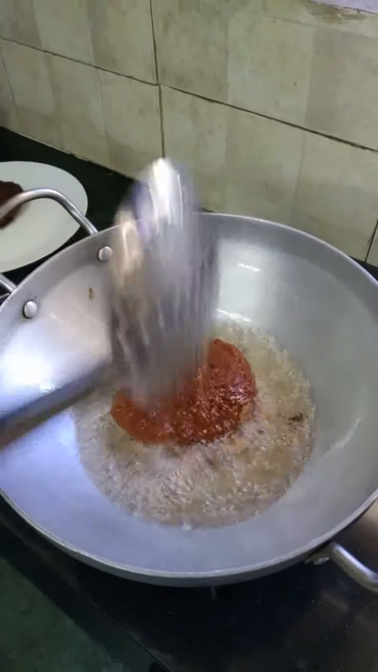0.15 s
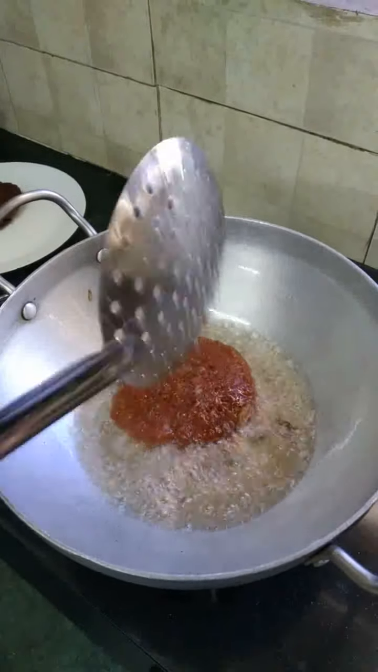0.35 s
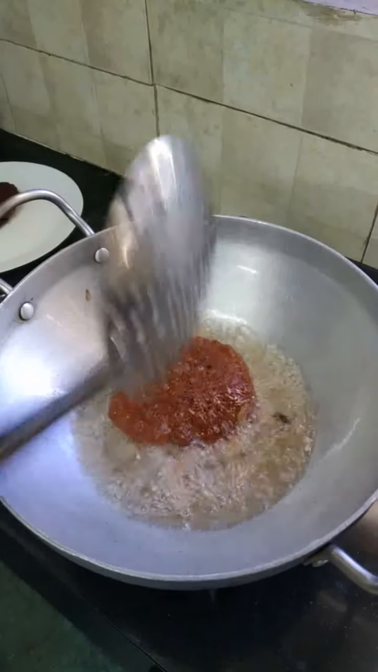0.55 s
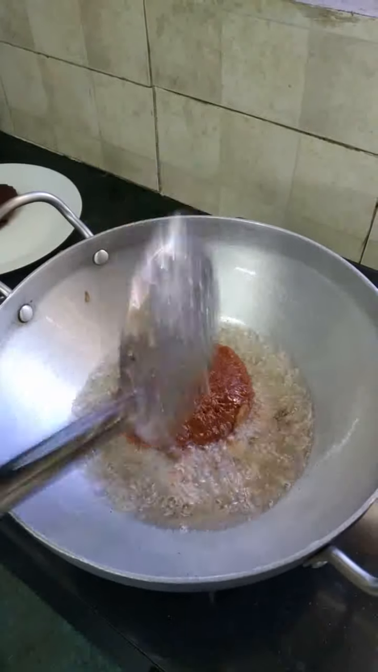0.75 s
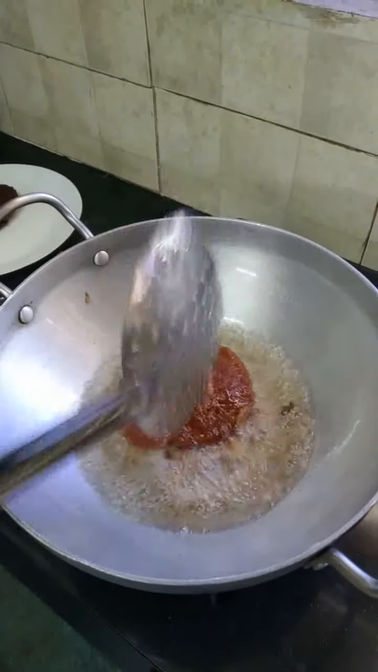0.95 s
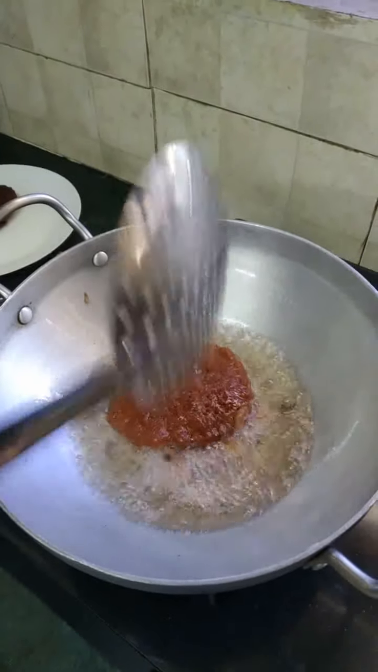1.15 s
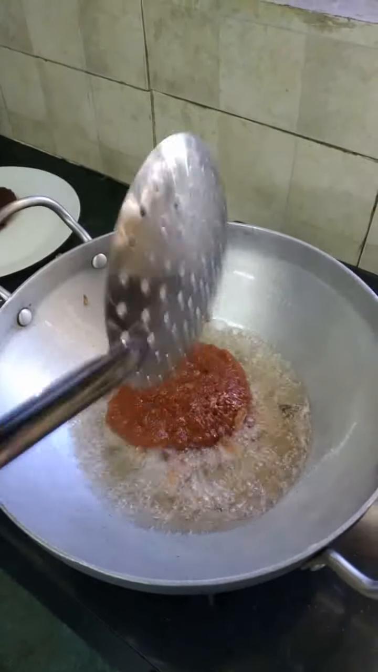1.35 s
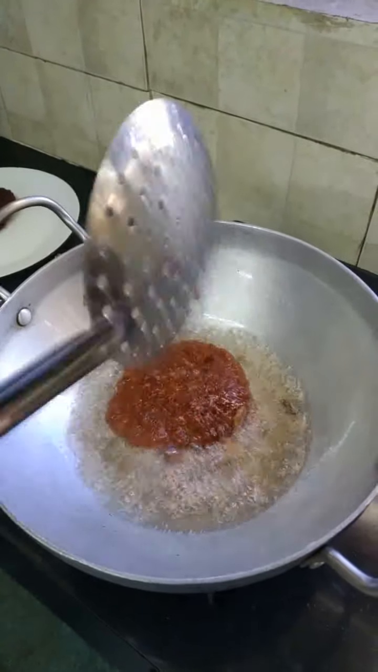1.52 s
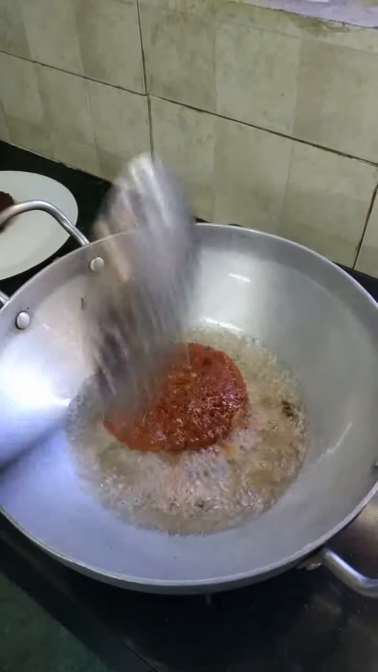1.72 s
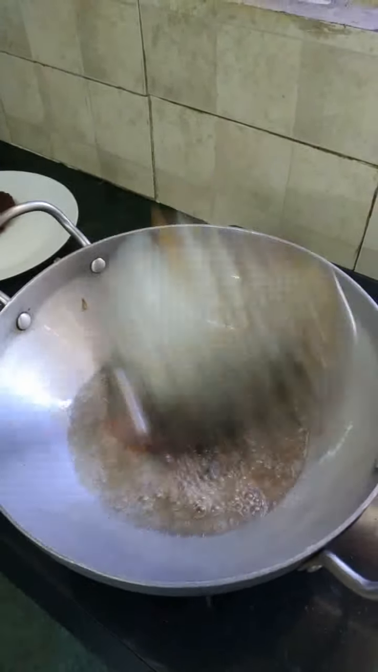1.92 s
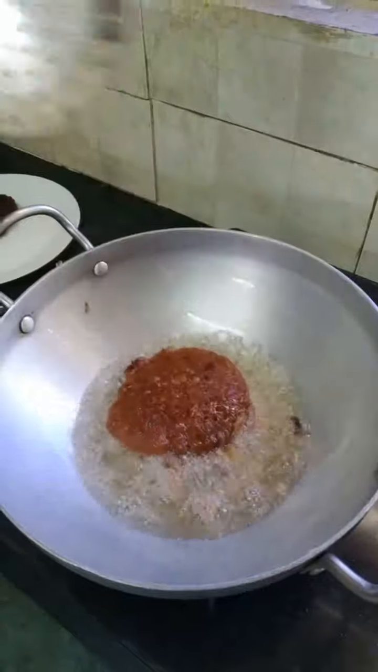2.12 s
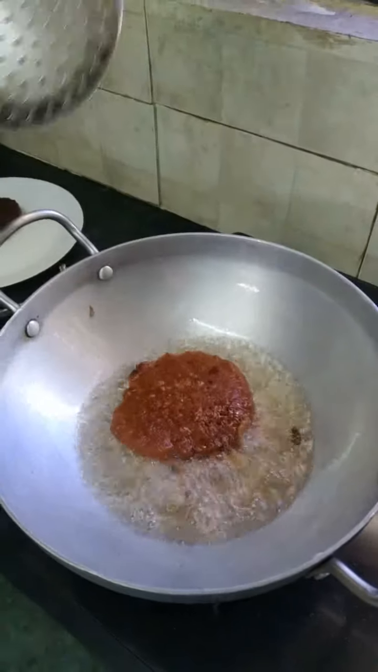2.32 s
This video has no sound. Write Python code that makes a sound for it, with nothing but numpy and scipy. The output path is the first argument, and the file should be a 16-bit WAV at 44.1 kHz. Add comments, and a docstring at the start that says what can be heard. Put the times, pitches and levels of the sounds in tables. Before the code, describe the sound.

Food sizzling in hot oil, bright fizzing with sharp crackling pops and two light metallic knocks

```python
"""Batter frying in a pan

Thousands of tiny steam bubbles fizz as short decaying tones over a hiss of noise. Larger ones pop with a
pitched ping and a snap, each stirring up the fizz. Something knocks twice nearby: damped metallic modes.
A tiled kitchen answers with random fading echoes; a low hum of filtered noise lies under it all.
A phone with two microphone ports and a wide stereo image listens."""
import sys
import numpy as np
from scipy import signal
from scipy.fft import rfft, irfft, next_fast_len
from scipy.io import wavfile
from scipy.ndimage import uniform_filter1d

SR = 44100
rng = np.random.default_rng(int(sys.argv[2]) if len(sys.argv) > 2 else 0)


def pcm_store(signal):
    """Save signal as 16-bit PCM."""
    levels = np.round(np.clip(np.atleast_2d(signal), -1, 1) * 32767)
    wavfile.write(sys.argv[1], SR, levels.astype(np.int16).T)


def amplitude_ratio(level_db):
    """Convert a level in decibels to the matching linear amplitude (field) ratio."""
    exponent = np.asarray(level_db, float) / 20
    return 10 ** exponent


N = 108045  # length in samples
PORT_LAG = 6  # samples by which the right port hears early


def evened(x):
    """Scales a signal to an rms of 1."""
    return x / np.sqrt(np.mean(x ** 2) + 1e-20)


def read(points, hz):
    """Reads a table of (f/Hz, value) between its points, on a log frequency scale."""
    f, value = np.transpose(points)
    return np.interp(np.log(hz + 1), np.log(f + 1), value)


def colour(x, gain):
    """Filters by a gain that is a function of frequency in Hz."""
    size = next_fast_len(x.shape[-1] + 2048)
    spectrum = rfft(x, size) * gain(np.fft.rfftfreq(size, 1 / SR))
    return irfft(spectrum, size)[..., :x.shape[-1]]


def add(mix, s, pan_db, sound):
    """Places a sound at s seconds, left louder than right by pan_db, right port early."""
    for k in (0, 1):
        part = mix[k, round(s * SR) - k * PORT_LAG:][:len(sound)]
        gain = np.sqrt(2 / (1 + amplitude_ratio(pan_db * (2 * k - 1)) ** 2))
        part += sound[:len(part)] * gain


# How long echoes last in the kitchen, high sounds dying sooner: (f/Hz, time to fall 60 dB t/s)
KITCHEN_DECAY = [(1000, 0.35), (2500, 0.16), (6600, 0.064), (12000, 0.02)]


def kitchen(x):
    """Echoes off the walls: sparse random taps per channel, each band dying at its own speed."""
    taps = np.zeros((2, SR // 2))
    at = np.arange(120, SR // 2 - 20, 20)
    at = at + rng.integers(0, 20, (2, len(at)))
    np.put_along_axis(taps, at, rng.choice([-1., 1.], at.shape), 1)
    hz, t, bands = signal.stft(taps, SR, nperseg=128)
    fade = amplitude_ratio(-60 * t / read(KITCHEN_DECAY, hz)[:, None])
    tail = signal.istft(bands * fade, SR, nperseg=128)[1]
    tail = tail / np.linalg.norm(tail[0])
    return signal.fftconvolve(x[None], tail, axes=1)[:, :len(x)]


# How lively the frying is over time, before spatter and fizz gains: (t/s, level/dB)
FRYING_LEVEL = [(0.0, -48), (0.54, -49), (0.76, -50), (1.85, -51.5), (2.23, -53), (2.36, -52),
                (2.45, -55.5)]


def liveliness():
    """Slow level of the frying plus the spatter that follows each pop and dies away."""
    spatter_db, spatter_s = 26.5, 0.013  # dB under a pop 1000 Hz wide; decay time of the power
    t = np.arange(N) / SR
    power = amplitude_ratio(2 * np.interp(t, *np.transpose(FRYING_LEVEL)))
    for s, db, hz, pan_db, width_hz in POPS:
        fade = (t > s) * np.exp(-abs(t - s) / spatter_s)
        power = power + amplitude_ratio(2 * (db - spatter_db)) * width_hz / 1000 * fade
    return np.sqrt(power)


# Tone colour of the sizzle; the snap of a pop takes it twice over: (f/Hz, level/dB)
SIZZLE_COLOUR = [(150, -20.5), (600, -9), (1500, -11.5), (2500, -9.5), (3400, -8), (4000, -4), (5500, -0.5),
                 (7000, 0), (7900, -1.5), (8400, -14), (10500, -12), (13000, -15), (16000, -18)]


def fizz():
    """Small bubbles of all sizes burst as short tones at random moments over a fine hiss of steam."""
    per_s, spread_db = 1300, 4.5  # bubbles per second; average spread of their levels before the cap
    clump_db, clump_s = 1.5, 0.02  # size and time span of the drift in bubble strength
    cycles = 1.85  # sets decay: a tone falls to 1/e in this many cycles
    room_db = 2.4  # gain of the kitchen echoes beside the bubbles
    bubbles_db, hiss_db = 2.5, 1.5  # balance before colouring

    spread = amplitude_ratio(spread_db * np.minimum(rng.exponential(1, N), 3))
    size = spread * (rng.random(N) < per_s / SR)
    clumps = uniform_filter1d(rng.standard_normal(N), round(clump_s * SR))
    size = size * amplitude_ratio(clump_db * evened(clumps))
    kind = rng.integers(0, 40, N)  # which of 40 pitches each bubble has
    out, t = np.zeros((2, N)), np.arange(500) / SR
    for k, hz in enumerate(np.linspace(2600, 11500, 40)):
        envelope = np.minimum(t / 0.00024, 1) * np.exp(-t * hz / cycles)
        grain = envelope * np.sin(2 * np.pi * hz * t)
        train = signal.oaconvolve(size * (kind == k), grain / np.linalg.norm(grain))[:N]
        left_share = rng.uniform(0.14, 1.0)  # part of the power heard on the left
        gains = np.sqrt([[left_share], [1 - left_share]])
        out += gains * np.array([train, np.roll(train, -PORT_LAG)])
    bubbles = evened(out + amplitude_ratio(room_db) * kitchen(out[0]))
    hiss = rng.standard_normal((2, N))
    both = amplitude_ratio(bubbles_db) * bubbles + amplitude_ratio(hiss_db) * hiss
    shaped = colour(both, lambda f: amplitude_ratio(read(SIZZLE_COLOUR, f)))
    return 1.726 * shaped * liveliness()


# Tone colour of the hum's noise, only relative levels count: (f/Hz, level/dB)
HUM_COLOUR = [(18, -68), (30, -36), (91, -8), (125, -12), (187, -6), (239, -6.5), (305, -11.5),
              (517, -10.5), (802, -12), (2000, -14.5), (2600, -58), (4400, -120)]
# Narrow strands added to that colour: (f/Hz, width f/Hz, level/dB relative to the noise)
HUM_STRANDS = [(184.7, 13.7, 2.5), (277.6, 7.7, 9.5), (644, 7.9, 8.5), (809, 28, 2.5)]
# Slow rise and fall of the hum around its base level: (t/s, level/dB)
HUM_DRIFT = [(0, 2), (1.1, 0.5), (1.75, -1.5), (2.0, 1), (2.45, -1)]


def hum():
    """Low noise of the room and the burner with narrow strands; its lower and upper parts waver apart."""
    base_db = -61.5
    waver_db, waver_s = 1.5, 0.0063  # rms size; span of the first of two smoothings

    def strands(f):
        return 1 + sum(amplitude_ratio(db) / (1 + (2 * (f - hz) / width) ** 2) for hz, width, db in HUM_STRANDS)

    noise = colour(rng.standard_normal((2, N)), lambda f: amplitude_ratio(read(HUM_COLOUR, f)) * strands(f))
    low = colour(noise, lambda f: 1 / (1 + (f / 400) ** 4))
    high = noise - low
    waver = uniform_filter1d(rng.standard_normal((2, N)), round(waver_s * SR))
    waver = uniform_filter1d(waver, 1000)
    waver = amplitude_ratio(waver_db * evened(waver))
    level_db = base_db + np.interp(np.arange(N) / SR, *np.transpose(HUM_DRIFT))
    return amplitude_ratio(level_db) * evened(low * waver[0] + high * waver[1])


def ping(hz, width_hz, chance):
    """A bubble swells and dies smoothly at its own pitch; a wider band means a shorter ping."""
    t = np.arange(600) / SR
    u = t * width_hz / 0.86  # reaches its peak at u = 1
    envelope = (u * np.exp(1 - u)) ** 2.06
    return envelope * np.sin(2 * np.pi * (hz * t + chance))


def snap(noise):
    """The noisy burst of a bubble: noise that quickly swells and dies, scaled to a peak of 1."""
    swell_s = 0.0005
    t = np.arange(600) / SR
    burst = noise * t / swell_s * np.exp(-t / swell_s)
    burst = colour(burst, lambda f: amplitude_ratio(2 * read(SIZZLE_COLOUR, f)))
    return burst / abs(burst).max()


# Large bubbles: (t/s, ping level/dB before panning, pitch f/Hz, left over right level/dB, width f/Hz)
POPS = [(0.0572, -30, 4300, 14, 2420), (0.2055, -17, 5280, -26, 890), (0.2112, -16.5, 5600, -7, 2480),
        (0.238, -19.5, 6750, -27, 1701), (0.323, -30, 7600, -5, 667), (0.3666, -28, 4960, -1, 2580),
        (0.384, -22.5, 4250, 39, 616), (0.5024, -23.5, 7030, -15, 1380), (0.5054, -22.5, 6400, -16, 1390),
        (0.552, -32, 5560, -13, 1500), (0.5648, -27, 6200, -12, 2510), (0.5738, -23.5, 4560, 1.5, 500),
        (0.7, -10, 4083, 30, 650), (0.829, -25, 5750, -12, 1960), (0.963, -30, 5770, -5, 700),
        (0.97, -20.5, 5680, -15, 1490), (0.9708, -23.5, 4380, -36, 900), (1.0443, -23.5, 6070, -6, 1210),
        (1.0476, -21, 6620, -9, 1010), (1.099, -23.5, 3690, 23, 657), (1.1613, -32.5, 6460, -11, 1528),
        (1.192, -28, 7600, 21, 1860), (1.21, -22.5, 5340, -1, 1210), (1.515, -29, 6800, -23, 1090),
        (1.679, -24.5, 5790, -3.5, 732), (1.7525, -17, 6710, -9, 1100), (1.942, -35, 5300, -4, 1200),
        (1.9455, -38, 7400, -4, 705), (1.999, -27, 4230, 1, 850), (2.012, -14, 5970, -42, 930),
        (2.073, -27.5, 7340, 9, 1070), (2.178, -26.5, 6160, -10, 660), (2.265, -33.5, 5940, -2, 1950),
        (2.341, -30, 7300, -6, 1420), (2.4304, -27.5, 3970, -6, 3380)]


def pops():
    """Each large bubble pings and snaps; three room tails take turns answering."""
    snap_db, room_db = -12.5, -6  # snap beside the ping, for a width of 1000 Hz; gain of the echoes
    direct, sends = np.zeros((2, N)), np.zeros((3, 2, N))
    chance = rng.random((len(POPS), 1 + 600))
    for k, (s, db, hz, pan_db, width_hz) in enumerate(POPS):
        snap_gain = amplitude_ratio(snap_db) * width_hz / 1000
        burst = snap_gain * snap(chance[k, 1:] - 0.5)
        sound = amplitude_ratio(db) * (ping(hz, width_hz, chance[k, 0]) + burst)
        add(direct, s - 0.0003, pan_db, sound)
        add(sends[k % 3], s, 0, sound)
    return direct + amplitude_ratio(room_db) * sum(kitchen(x[0]) for x in sends)


# Blows, the first two so close that they sound as one: (t/s, peak level/dB before panning,
# left over right level/dB)
KNOCKS = [(1.8305, -24, 25), (1.8362, -27, 17), (1.9333, -26, -13)]
# Ringing modes of the struck thing: (f/Hz, relative level/dB, time to fall 60 dB t/s)
KNOCK_MODES = [(666, -16, .025), (900, -12.5, 0.023), (1257, -10.5, .02), (1700, -10, 0.023),
               (2430, -4, 0.011), (2984, 12.5, 0.0072), (4300, 2.5, .012), (5300, -1, .01),
               (6980, -2, 0.023)]


def knocks():
    """Short blows set the same few modes ringing, each dying at its own speed."""
    room_db = -1.5
    direct, t = np.zeros((2, N)), np.arange(3000) / SR
    ring = sum(amplitude_ratio(db - 60 * t / t60) * np.sin(2 * np.pi * hz * t) for hz, db, t60 in KNOCK_MODES)
    ring = ring * np.minimum(t / 0.00043, 1)  # soft start, in seconds
    for s, db, pan_db in KNOCKS:
        add(direct, s, pan_db, amplitude_ratio(db) * ring / abs(ring).max())
    return direct + amplitude_ratio(room_db) * kitchen(direct.mean(0))


def scene():
    """Everything that sounds in the kitchen, added together."""
    return fizz() + pops() + knocks() + hum()


# Stereo width by pitch: (f/Hz, likeness of left and right, from -1 opposite to 1 the same)
LIKENESS = [(30, 0.5), (70, 1), (250, 0.93), (700, 0.46), (1400, 0.6), (1900, -0.3), (2450, -0.33),
            (2700, -0.64), (3700, -0.89), (4000, -0.24), (5000, -0.079), (6000, -0.2), (16000, 0.27)]


def stereo_width(dry):
    """Weighs sum against difference by pitch: bass alike, low treble opposite in the two channels."""
    left_db = 0.74  # left over right

    def same(f):
        return np.clip(read(LIKENESS, f), -0.995, 0.995)

    mid = colour(dry[0] + dry[1], lambda f: np.sqrt(1 + same(f))) / 2
    side = colour(dry[0] - dry[1], lambda f: np.sqrt(1 - same(f))) / 2
    return np.array([(mid + side) * amplitude_ratio(left_db / 2), (mid - side) * amplitude_ratio(-left_db / 2)])


def roll_off(x):
    """The treble ends steeply here."""
    return signal.sosfilt(signal.butter(12, 16120, fs=SR, output="sos"), x)


def record(dry):
    """The phone cuts the deepest bass and sets the stereo width."""
    low_cut_hz = 33
    dry = colour(dry, lambda f: 1 / np.sqrt(1 + (low_cut_hz / (f + 1)) ** 6))
    pair = stereo_width(dry)
    return roll_off(pair)


dry = scene()
out = record(dry)
pcm_store(out)
```